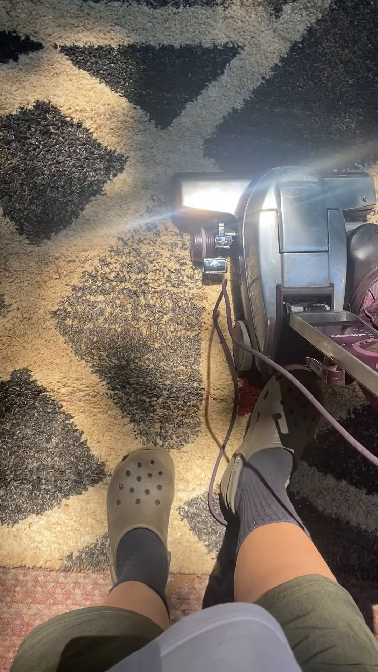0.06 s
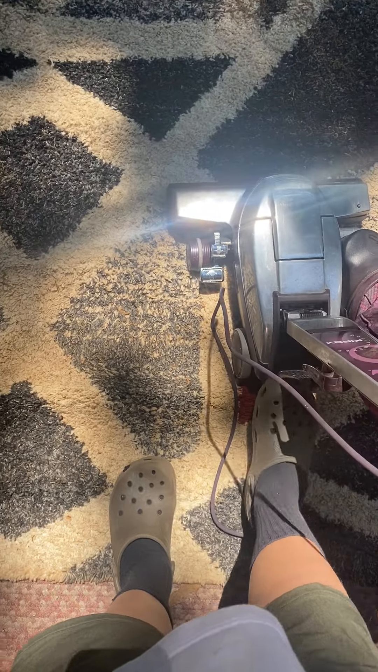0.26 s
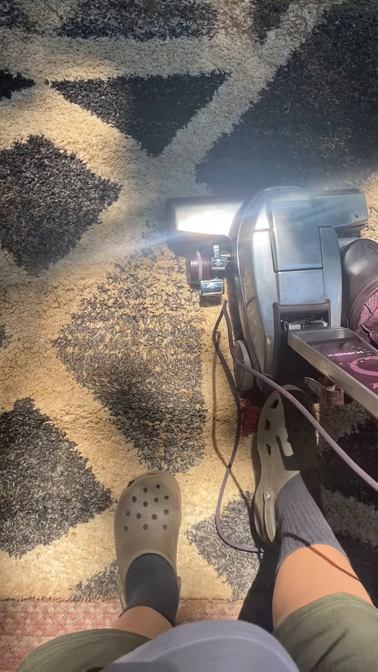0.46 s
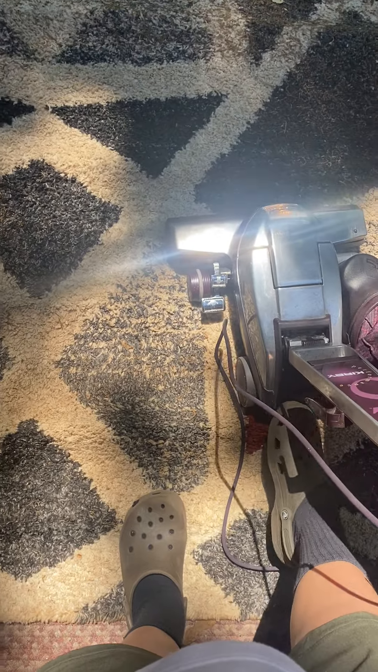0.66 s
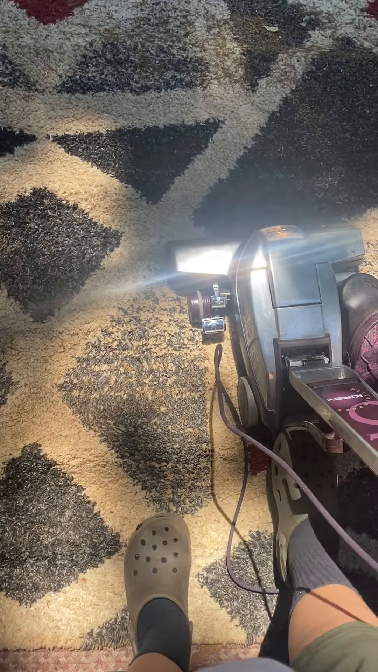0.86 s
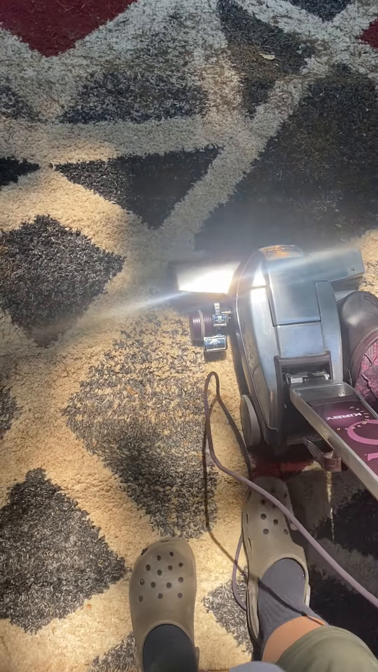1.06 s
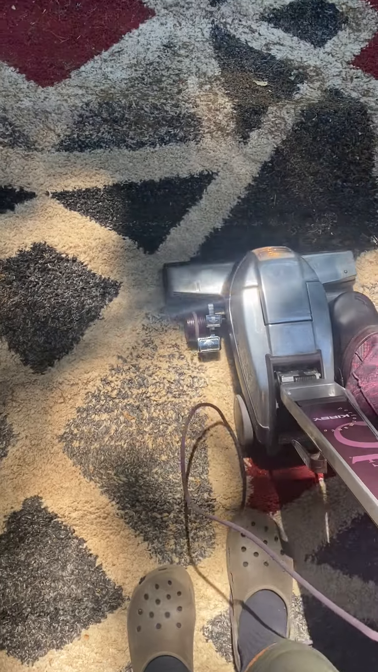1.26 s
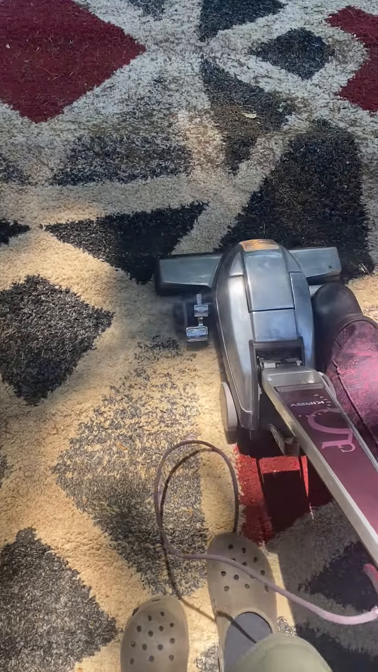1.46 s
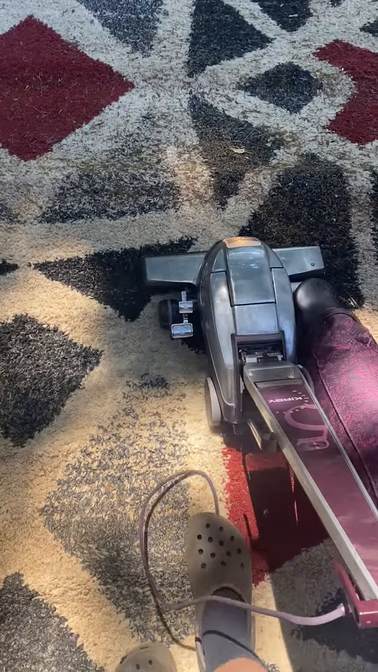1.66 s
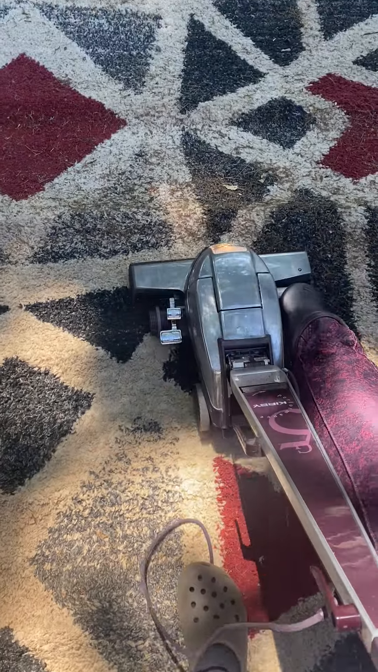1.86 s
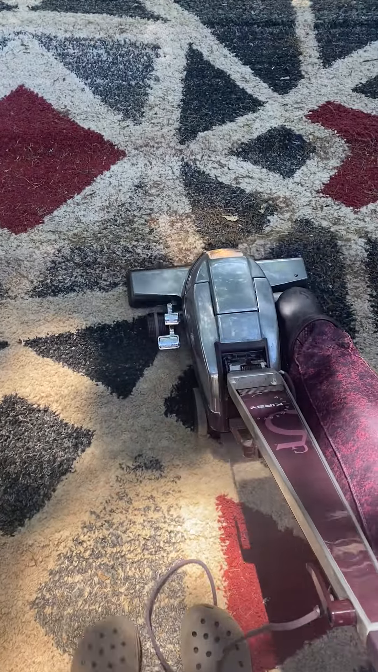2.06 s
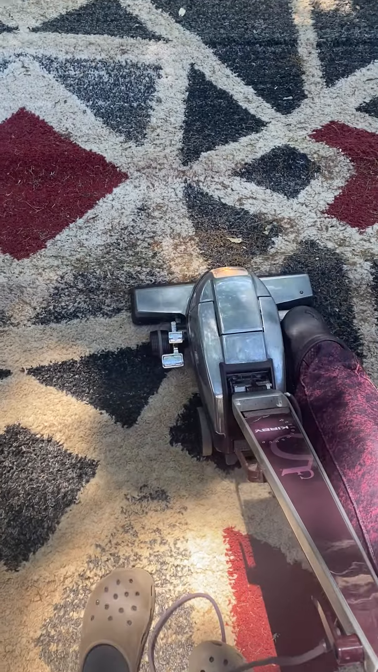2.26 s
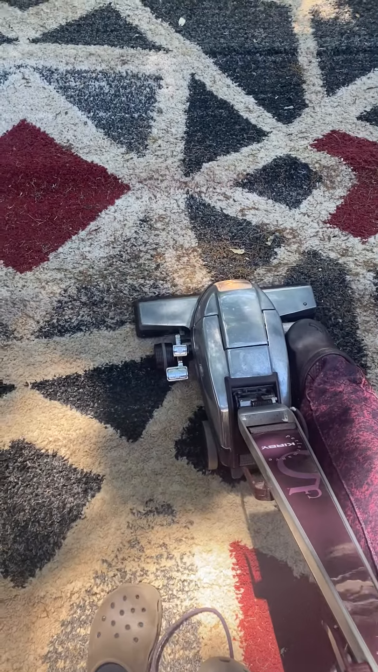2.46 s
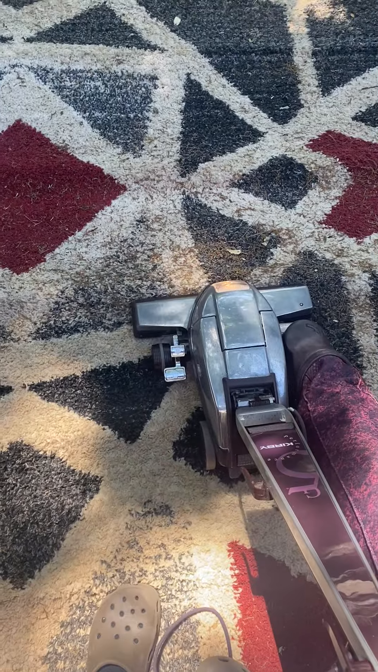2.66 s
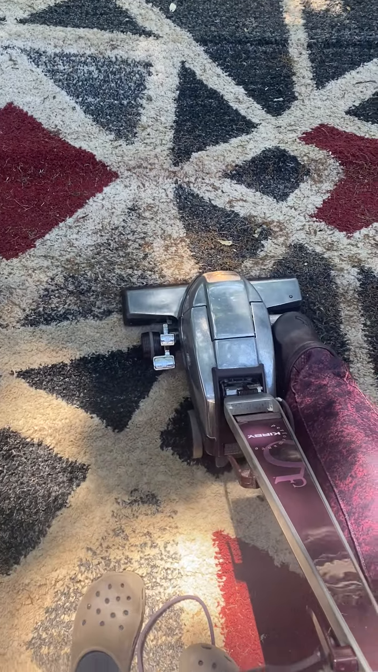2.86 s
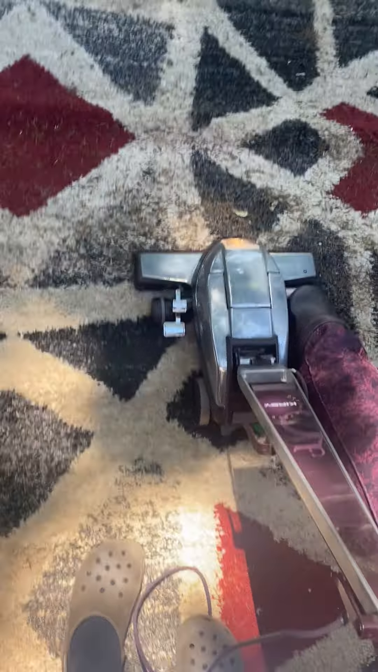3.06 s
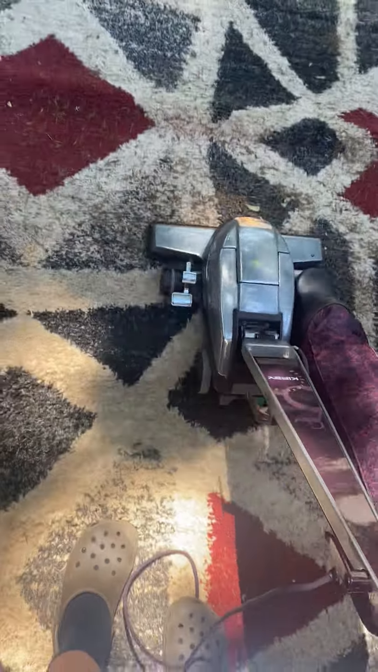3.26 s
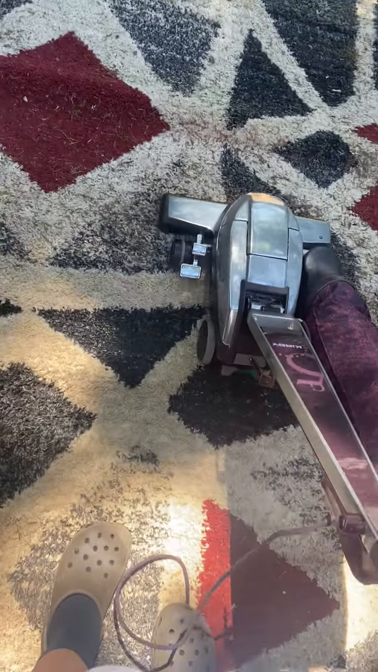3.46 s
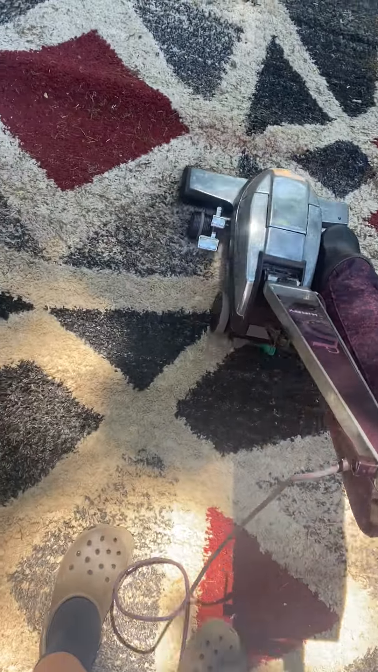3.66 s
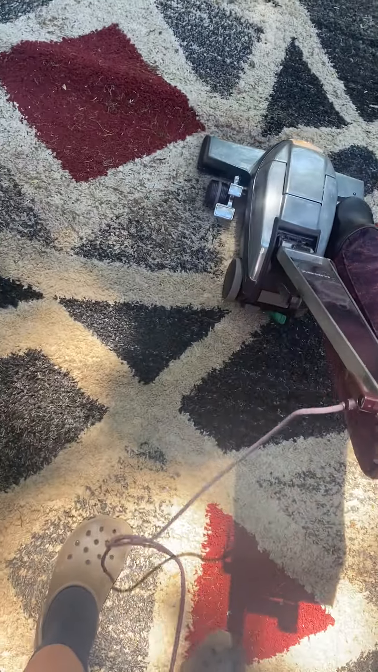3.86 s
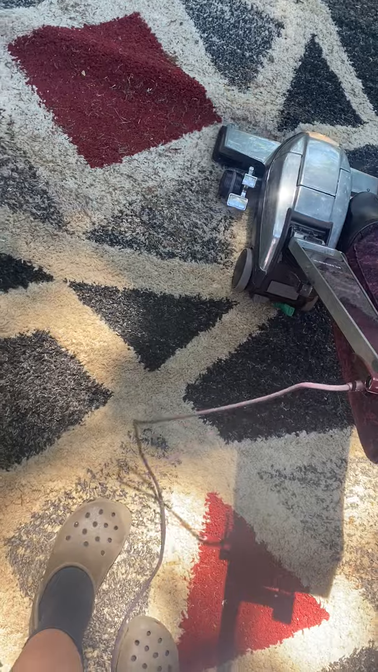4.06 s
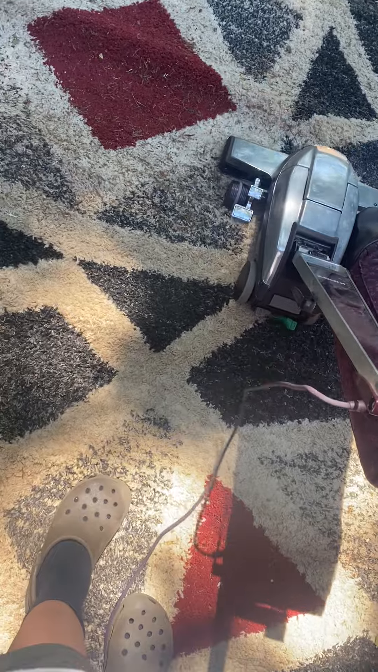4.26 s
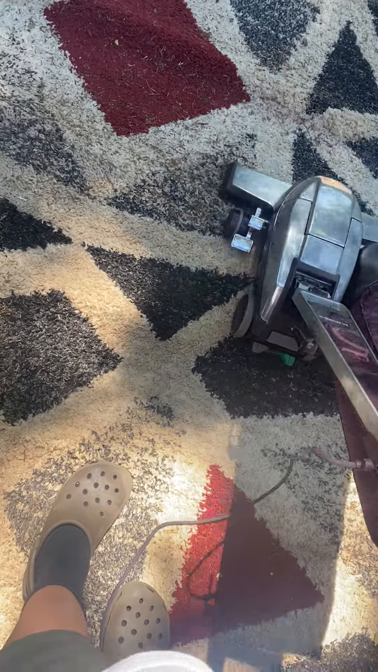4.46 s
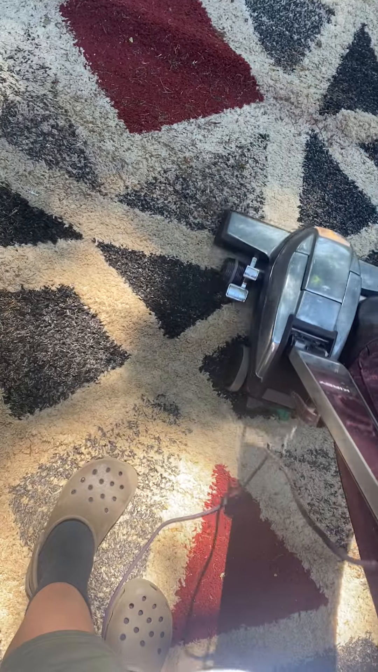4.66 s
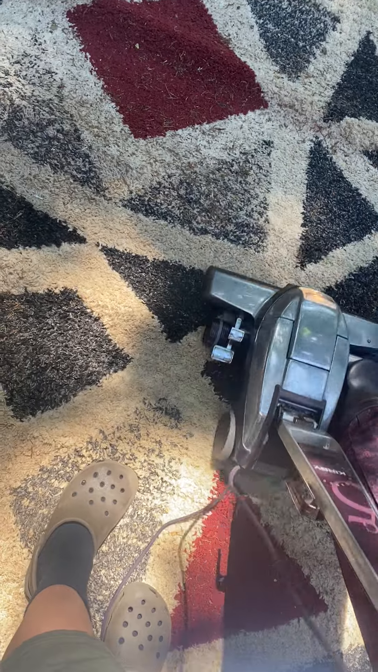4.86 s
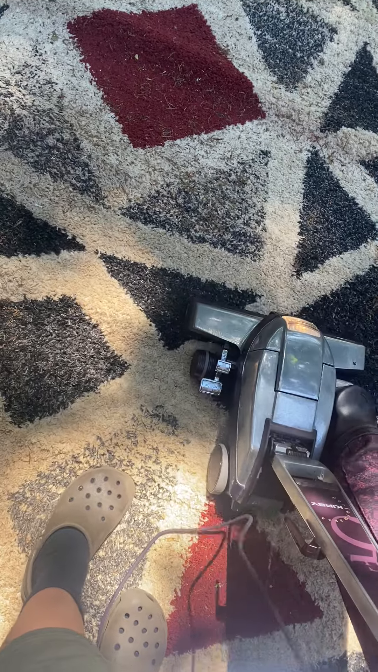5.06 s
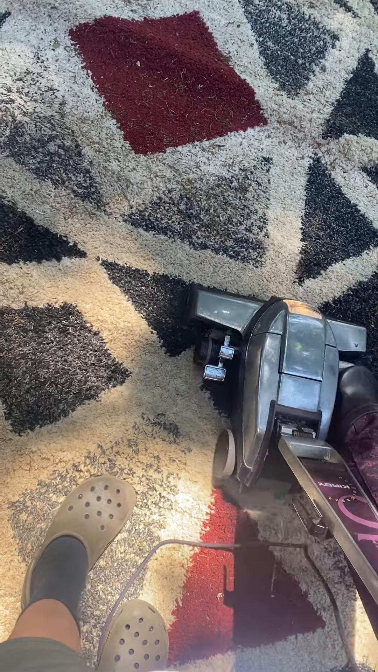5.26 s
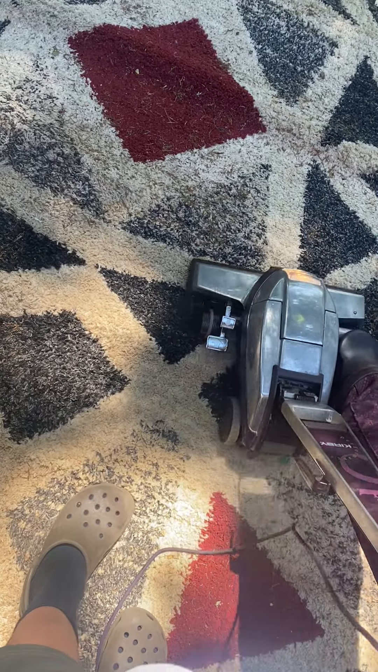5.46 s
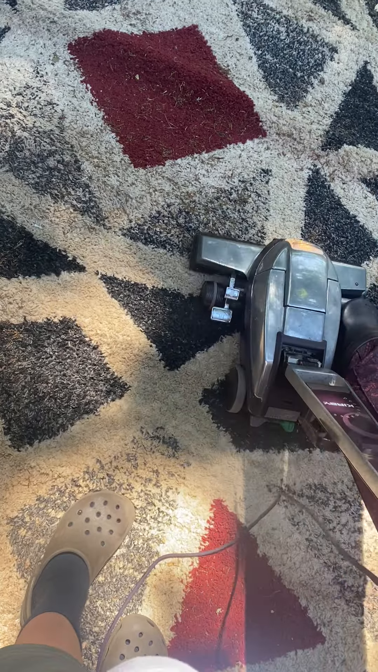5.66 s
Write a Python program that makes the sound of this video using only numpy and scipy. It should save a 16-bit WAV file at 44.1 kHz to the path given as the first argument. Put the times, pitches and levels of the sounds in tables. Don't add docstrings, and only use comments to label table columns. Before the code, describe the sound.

Close up in a quiet yard, a shoe knocks a pedal, a latch snaps and a switch clicks. An upright vacuum's motor sweeps up in under a second to a high whine over roaring, hissing air. Its brush roll hums on the rug, grit pings inside, and gears sing louder during two pushes. A phone at arm's length above captures it in stereo.

```python
import sys
import numpy as np
from scipy import signal
from scipy.fft import rfft, irfft, next_fast_len
from scipy.io import wavfile
from scipy.ndimage import uniform_filter1d

SR = 44100
rng = np.random.default_rng(int(sys.argv[2]) if len(sys.argv) > 2 else 0)


def amp(db):
    return 10 ** (np.asarray(db, float) / 20)


def write(x):
    x = np.atleast_2d(x).T
    wavfile.write(sys.argv[1], SR, np.round(np.clip(x, -1, 1) * 32767).astype(np.int16))


N = 251811
T = np.arange(N) / SR

# frequency in Hz, level in dB per Hz.
YARD = [(15, -36), (25, -6), (92, 2), (281, -15), (355, -13.5), (782, -23), (1190, -22), (1570, -27),
        (1690, -33), (2030, -28), (2680, -28), (6060, -43), (6500, -44), (8450, -79), (14300, -120)]
YARD_DB = -52.5

# frequency in Hz, level in dB per Hz.
ROAR = [(18, -61), (30, -44), (54, -49), (90, -27), (150, -9.5), (207, -6), (255, -6.5), (340, -2.5),
        (399, -2.5), (517, -3.5), (668, -14.5), (797, -12.5), (1400, -27), (1820, -37.5), (3080, -120)]
RUSH = [(590, -10.5), (1000, -6.5), (1370, -9.5), (1510, -5), (1740, -4.5), (2280, -1.5), (2900, -14.5),
        (3200, -20), (4160, -46), (7040, -120)]
HISS = [(2400, -28), (2900, -9), (3300, -0.5), (3650, 0), (4000, -1.5), (4300, -2.5), (4700, -2.5),
        (5200, 0.5), (5700, -4), (7100, -7), (7800, -4), (9000, -46)]
FIZZ = [(6500, -47), (7800, -7), (8400, 1.5), (9400, -2), (10500, -5.5), (13500, -9.5), (15700, -11),
        (15950, -60)]
# level in dB, slope in dB per dB of speed, gain in a hard push in dB.
AIR_LEVELS = [
    (-22, 2, -0.5),
    (-29, 1, -1),
    (-35.5, 0.47, 2),
    (-47.5, 1, 2.5),
]
# time in seconds, level in dB.
SEAT = [(.9, 3), (1.6, 1), (1.75, 1), (2.3, -1), (2.7, 0), (2.9, -2.5), (3.1, 0), (3.3, -1), (3.65, -0.5),
        (3.9, -1), (4.4, -2), (4.48, 1.5), (4.75, 1), (5.0, 1), (5.7, -0.5)]
# centre in seconds, length in seconds, change in dB.
JOLTS = [
    (.575, 0.043, 8),
    (2.47, 0.035, -4),
    (3.315, 0.024, 4),
    (3.35, .015, -3),
    (3.46, .03, 3.5),
    (3.515, 0.033, 5),
    (3.575, .02, -14),
    (4.8, 0.032, -2),
    (4.9, 0.096, 0),
]
# centre in seconds, length in seconds, change in dB.
RIDGES = [
    (2.92, .12, 1.5),
    (3.51, .06, 1.5),
    (.72, .016, 2),
    (0.83, .03, 2),
    (5.6, 0.24, -2),
    (3.05, 0.34, 2.5),
    (4.6, 0.52, 0.5),
    (4.12, .15, 0),
]
# centre in seconds, length in seconds, change in dB.
OUTLET_SWINGS = [
    (2.6, 0.61, -1),
    (3.05, 0.27, 0.5),
    (3.75, .3, -0.5),
    (5.08, 0.2, -2),
]
# centre in seconds, length in seconds, change in dB.
DUST_STREAMS = [
    (4.63, 0.6, 1),
    (4.9, 0.065, 3.5),
    (4.0, 0.54, 1),
    (3.64, 0.32, 1.5),
]
SUCTION_S, SUCTION_LAG_DB = 0.12, -19
# frequency in Hz, width in Hz, level in dB.
AIR_SPACES = [
    (392.6, 44, -29.5),
    (520.5, 59, -32),
    (805.4, 60, -40),
]

# start in seconds, peak in dB, fall by 60 dB in seconds,
# scuff in dB, spring tick in dB.
PEDAL_KNOCKS = [
    (0.08, -50, 0.02, -1, -30),
    (0.101, -33.5, 0.037, 1.5, -20),
    (0.131, -44, 0.034, -5, -18),
    (0.242, -60, 0.02, -9, -8),
    (0.353, -48, 0.025, -3, -28),
    (0.382, -46, 0.02, -1, -14),
    (0.3988, -23.5, 0.019, -4, 2),
    (0.43, -43, 0.023, -1, -22),
    (0.548, -19, 0.025, -9, -19),
    (0.553, -31, 0.016, -12, -21),
]
# frequency in Hz, width in Hz, level in dB.
PEDAL_BODY = [(345, 49, 8), (1020, 860, 11), (2130, 330, 11), (3350, 660, -6), (4470, 670, -2),
              (11000, 8300, -31)]
# start in seconds, peak in dB, frequency in Hz, fall by 60 dB in seconds.
LATCH = [(0.08, -47, 900, .02), (0.121, -46, 1000, .015), (0.146, -44, 980, .02), (0.102, -37, 2240, .02),
         (0.103, -37, 1010, 0.054), (0.132, -38, 1020, .02), (0.132, -45, 2000, .012),
         (0.353, -48, 1050, .02), (0.3992, -15, 2260, 0.0088), (0.43, -38, 1020, 0.018),
         (0.43, -44, 4300, .012), (0.43, -46, 2180, .012), (0.402, -43, 354, 0.18), (0.15, -50, 418, .1),
         (0.385, -47, 2250, .02), (0.548, -27, 990, 0.03), (0.549, -26, 4650, .012),
         (0.549, -25, 3600, .012)]
# centre in seconds, length in seconds, level in dB.
SHOE_RUBS = [
    (0.197, 0.2, -81),
    (.33, 0.081, -86),
    (.46, .1, -78),
]

# start in seconds, peak in dB, ring in Hz, knock on the nozzle in dB.
GRIT = [(1.4637, -33, 9190, -2), (1.5069, -17.5, 9550, -2), (1.708, -28.5, 9320, -2),
        (1.865, -19, 9620, -5), (1.8996, -17, 9380, -7), (1.939, -20, 9400, -14), (2.021, -22, 9180, -6),
        (2.2338, -18, 9510, -4), (2.403, -23.5, 8520, -4), (3.367, -10, 10200, -11),
        (3.3795, -21, 10000, -6), (3.3915, -19, 10360, -3), (3.4381, -23, 10260, 4),
        (3.4535, -19, 11000, -6), (3.467, -25, 9500, -6), (3.498, -16, 9560, -3), (3.502, -16, 10350, -1),
        (3.5053, -13.5, 9700, 5.5), (3.508, -23, 10200, 1), (3.522, -27, 9440, -2),
        (3.5294, -9.5, 10700, 1.5), (3.568, -16, 9860, -3), (3.6165, -26, 11940, -6),
        (3.655, -26, 9360, -4), (3.683, -28, 11500, -6), (3.69, -18, 11000, -6), (3.70, -28, 9500, -6),
        (3.7518, -34, 9550, -2), (3.8175, -22.5, 10400, -2), (4.0358, -27, 9940, -2),
        (4.0627, -20, 9770, -4)]
# start in seconds, peak in dB, frequency in Hz.
PEBBLES = [
    (3.522, -25, 4850),
    (3.522, -24, 6100),
    (3.5295, -23, 4760),
]
GRIT_T60_S = 0.0095
SANDY_S, SAND_PER_S, DUST_PER_S = (2.6, 4.4), 67, 15.

# time in seconds, frequency in Hz, level in dB.
SNAG = [
    (4.42, 520.5, -50),
    (4.46, 474, -16.5),
    (4.482, 355, -38),
    (4.5, 237.8, -19),
    (4.515, 203.2, -48),
]
# time in seconds, bristle-row beat in Hz, beat in dB, wobble of the roll in dB.
BRUSH = [(.62, 89.1, -49, -63), (.73, 141.7, -31, -57), (.82, 167.2, -21, -40), (.89, 178, -20.5, -31),
         (1.1, 193.3, -22.5, -27), (1.28, 201.3, -22.5, -30.5), (1.9, 214.6, -27.5, -35.5),
         (2.2, 213.4, -21.5, -31.5), (2.32, 208.8, -22, -47.5), (2.95, 201.2, -21.5, -32),
         (3.34, 202.7, -28, -39), (3.405, 218.9, -25, -41.5), (3.87, 208.5, -24, -37.5),
         (4.1, 200.8, -24.5, -36), (4.85, 204.7, -27.5, -30.5), (5.11, 194.4, -20.5, -35.5),
         (5.22, 204.7, -26.5, -30.5), (5.45, 215.8, -27.5, -33.5), (5.71, 217.7, -28, -32)]
# multiple of the beat, level in dB, blur in Hz.
BRUSH_UPPER = [
    (2.5, -34, 10.28),
    (3, -42, 8.84),
    (4, -45, 9.1),
]
# frequency in Hz, level in dB.
HOUSING = [(235, -37), (268, -21), (295, -33.5), (322, -24), (345, -17.5), (375, -72), (405, -28),
           (432, -32)]
# centre in seconds, length in seconds, change in dB.
SKIPS = [
    (1.26, .05, -3),
    (3.36, .05, -5),
    (4.35, .08, -3),
    (4.43, .1, -14),
    (4.54, .08, 3),
    (4.615, .05, -11),
    (4.68, .03, -5),
    (4.75, .08, -11),
    (5.02, .05, -4),
]
# centre in seconds, length in seconds, change of wobble in dB.
ROLL_WOBBLE = [
    (1.32, .04, 5),
    (1.5, 0.092, -1),
    (2.42, .2, 2),
    (3.3, .12, 0),
    (3.72, 0.32, -3),
    (4.6, 0.27, -6.5),
    (5.03, .05, -6),
    (5.45, 0.061, -10),
]
# centre in seconds, length in seconds, change in dB.
PILE_DAMPING = [
    (1.45, 0.39, 5),
    (2.7, 0.74, -8),
    (4.3, 0.601, -7),
    (5.55, .35, -6),
]

# time in seconds, commutator tone at full run-up
# in Hz, then the lines one mains beat below, on and above that tone in dB.
RUNNING = [(.6, 3765, -9, 0, -3), (.64, 4200, -10, 4, 1), (.69, 4400, -6, 7.5, 5), (.8, 4345, -8, 2, 1),
           (.94, 4440, -8, 6, -4), (1.02, 4397, -7, 5, -5), (1.14, 4335, -1, 0, -11),
           (1.26, 4294, -8, -4, 2), (1.36, 4303, -3, -3, 3), (1.5, 4277, -4, 4, -5),
           (1.72, 4287, 0, -3, -5), (1.95, 4312, 0, -2, -18), (2.15, 4320, -6, 6, -12),
           (2.4, 4300, -5, 2, -14), (2.6, 4275, -9, 0, -11), (2.82, 4266, -19, 0, -7),
           (3.06, 4235, 1, 4, 4), (3.18, 4217, 0, 5, 2), (3.32, 4220, 0, 4, 0), (3.375, 4206, 2, 5, -1),
           (3.45, 4257, 2, 2, -2), (3.55, 4305, 1, 0, 0), (3.66, 4283, 1, 3.5, -10), (3.9, 4278, 0, 6, -8),
           (4.02, 4246, -2, 0, -9), (4.26, 4142, 1, 8, -3), (4.37, 4101, -2, 5.5, -2),
           (4.5, 4161, 2, 9, -2), (4.62, 4123, 6, 5.5, 5), (4.84, 4185, -5, 2, 3),
           (4.96, 4176, -13, -5, -4), (5.22, 4217, -16, -3, -4), (5.34, 4230, -14, -7, 0),
           (5.5, 4314, -3, -1.5, -4), (5.7, 4336, -1, 3, -5)]
MAINS_BEAT_HZ = 120
START_SPLIT_DB = 1.5
SWITCH_ON_S, SPIN_FROM_S, SPIN_TAU_S = .55, .525, .235
# frequency in Hz, level in dB.
SHELL = [(700, -44), (1000, -37), (1200, -42), (1400, -51), (1650, -34), (1850, -33), (2080, -33),
         (2250, -34), (2350, -46), (2500, -43), (2700, -45), (2950, -56), (3090, -46), (3250, -52),
         (3500, -52), (3660, -45), (3780, -49), (3950, -44.5), (4500, -45.5)]
# centre in seconds, length in seconds, change in dB.
CHOKES = [
    (.703, .022, -12),
    (.865, .075, -10),
    (.955, .04, -8),
    (1.18, .05, -4),
]
SHAFT = [1.09, 1.136, 2.182]
# time in seconds, level of each tone in dB.
SHAFT_DB = [(1.0, -66, -58, -70), (1.5, -64, -52, -62), (2.2, -62, -51, -59), (2.9, -62, -47, -59),
            (3.2, -62, -48, -65), (3.9, -62, -50, -68), (4.1, -64, -56, -63), (4.85, -64, -55, -62),
            (5.0, -66, -56, -70), (5.7, -66, -56, -70)]
# time in seconds, level in dB.
FAN = [(.9, -48), (1.1, -43.5), (1.3, -39), (2.0, -41.5), (2.8, -41), (3.3, -35.5), (3.9, -39.5),
       (4.05, -39), (4.77, -47), (4.84, -45), (5.2, -38), (5.7, -34)]
# multiple of the commutator tone, level in dB.
GEARS = [(.298, -9), (.368, -7), (.524, -2), (0.597, 0), (.77, -17), (.893, -3.5), (1.186, -10),
         (1.29, -15)]
# start in seconds, length in seconds, effort 0-1.
PUSHES = [
    (2.915, 0.268, 0.95),
    (3.915, 0.98, 1.0),
]
PUSH_RISE_S, PUSH_FALL_S, GEAR_IDLE_DB, GEAR_LOADED_DB = 0.11, 0.027, -75, -40
# centre in seconds, length in seconds, change in dB.
GEAR_SLIPS = [
    (3.05, .3, -8),
    (3.95, .12, -10),
    (4.22, .05, -5),
    (4.435, .04, -6),
    (4.655, .05, -7),
    (4.88, .13, -16),
]
# centre in seconds, length in seconds, change in dB.
GEAR_EASING = [
    (4.2, 0.083, -8),
    (4.55, 0.74, 1),
]

# frequency in Hz, lead in radians.
PORT_LEAD = [(0, 0), (800, -.4), (1100, .05), (2000, 0), (2550, .63), (3200, .43), (4300, .82), (4950, .15),
             (5340, .5), (7300, 3.14), (10400, 6.28), (13500, 9.42), (16000, 12.3)]
# frequency in Hz, left over right in dB.
PORT_TILT = [(60, -.2), (300, -1.4), (650, -2.5), (900, -5.2), (1350, -.4), (1900, -.4), (2350, -3.3),
             (3600, -1.2), (4300, -2.9), (5000, .4), (8000, 0)]
# frequency in Hz, share 0-1.
PORT_SAME = [(60, 1), (400, .995), (1050, .91), (1400, .99), (1900, .99), (2550, .91), (3000, .72),
             (4300, .8), (4650, .75), (5100, .94), (6000, .86), (7300, .91), (10400, .87), (12000, .75),
             (16000, .72)]


def evened(x):
    return x / np.sqrt(np.mean(abs(x) ** 2) + 1e-20)


def read(points, hz):
    f, value = np.transpose(points)
    return np.interp(np.log(hz + 1), np.log(f + 1), value)


def follow(rows):
    s, *columns = np.transpose(rows)
    return [np.interp(T, s, column) for column in columns]


def bumps(rows):
    return sum(db * np.exp(-(2 * (T - s) / length) ** 4) for s, length, db in rows)


def drift(hz):
    pole = np.exp(-2 * np.pi * hz / SR)
    return evened(signal.lfilter([1], [1, -2 * pole, pole ** 2], rng.standard_normal(N)))


def tone(hz):
    return np.sqrt(2) * np.sin(2 * np.pi * (np.cumsum(hz) / SR + rng.random()))


def band_noise(white, low_hz, high_hz):
    band = signal.butter(2, [low_hz, high_hz], "band", fs=SR, output="sos")
    return evened(signal.sosfilt(band, white))


def noise(shape, patchy_db, size=512):
    frames = 4 * N // size + 8
    hz = np.fft.rfftfreq(size, 1 / SR)
    a, b, c, d, patches = rng.standard_normal((frames, len(hz), 5)).T
    patches = uniform_filter1d(patches, size=5, axis=0)
    patches = evened(uniform_filter1d(patches, size=12, axis=1))
    level = amp(read(shape, hz)[:, None] + patchy_db * patches)
    z = np.array([a + 1j * b, c + 1j * d]) * level
    return evened(signal.istft(z, nperseg=size, noverlap=size * 3 // 4)[1][:, :N])


def burst(s, db, t60, rise=0.0012):
    out = np.zeros(N)
    span = (T > s) & (T < s + .6)
    t = T[span] - s
    out[span] = amp(db - 60 * t / np.clip(t60, .003, .3)) * np.minimum(t / rise, 1)
    return out


def run_up():
    return np.maximum(1 - np.exp(-(T - SPIN_FROM_S) / SPIN_TAU_S), .05)


def effort():
    total = 0
    for s, length, share in PUSHES:
        rise = (T - s) / PUSH_RISE_S
        fall = 1 - (T - s - length) / PUSH_FALL_S
        total = total + share * np.clip(np.minimum(rise, fall), 0, 1)
    return total


def yard():
    return amp(YARD_DB) * noise(YARD, patchy_db=3.5, size=2048)


def air(puff):
    speed_db, push = 20 * np.log10(run_up()), effort()
    seat_db, jolt_db = follow(SEAT)[0], bumps(JOLTS)
    roar_db, rush_db, hiss_db, fizz_db = [
        db + slope * speed_db + push_db * push for db, slope, push_db in AIR_LEVELS]
    roar_db = roar_db + seat_db + jolt_db
    rush_db = rush_db + 0.37 * seat_db + 0.057 * jolt_db + bumps(RIDGES)
    lag_db = SUCTION_LAG_DB * np.clip(1 - (T - SWITCH_ON_S) / SUCTION_S, 0, 1)
    hiss_db = hiss_db + bumps(OUTLET_SWINGS) + 0.082 * jolt_db + lag_db
    fizz_db = fizz_db + bumps(DUST_STREAMS) + 0.22 * jolt_db + lag_db
    gust_db = drift(69)
    rush_puff = 1 + 0.069 * (puff - 1) / 0.42
    out = amp(roar_db - 0.5 + 0.27 * gust_db) * puff * noise(ROAR, patchy_db=1.5, size=2048)
    out += amp(rush_db + 0.24 + 0.3 * gust_db) * rush_puff * noise(RUSH, patchy_db=1.5)
    out += amp(hiss_db - 1.5 + 0.92 * gust_db) * noise(HISS, patchy_db=0.86)
    out += amp(fizz_db + 3.0 + 0.28 * gust_db) * noise(FIZZ, patchy_db=1.5)
    return out * np.clip((T - .548) / 0.0061, 0, 1)


def cavity():
    hz = np.fft.rfftfreq(N, 1 / SR)
    booms = 0
    for f, width, db in AIR_SPACES:
        dip_db = (f > 700) * 5.6 * np.exp(-((T - 4.1) / 0.35) ** 2)
        boom = irfft(rfft(rng.standard_normal(N)) / (1 + (2 * (hz - f) / width) ** 2), N)
        booms = booms + amp(db + 2.37 * drift(9.) - dip_db) * evened(boom)
    contact = amp(follow(SEAT)[0] + bumps(JOLTS))
    return booms * run_up() ** 3 * contact * np.clip((T - .65) / .15, 0, 1)


def pedal():
    hz = np.fft.rfftfreq(N, 1 / SR)
    shell = sum(amp(db) / (1 + 2j * (hz - f) / width) for f, width, db in PEDAL_BODY) + amp(-30)
    ring = evened(irfft(rfft(rng.standard_normal(N)) * shell, N))
    spring = evened(np.diff(uniform_filter1d(rng.standard_normal(N + 2), size=2), 2))
    out = np.zeros(N)
    for s, db, t60, scuff_db, tick_db in PEDAL_KNOCKS:
        crack = burst(s, db - 3.0, t60, 0.0033)
        scuff = burst(s, db + scuff_db - 22.0, 7.6 * t60, 0.0046)
        out += ring * (crack + scuff)
        out += spring * burst(s, db + tick_db, 0.0095)
    rub = band_noise(spring, 7500, 12500)
    rubbing = sum(amp(db) * np.exp(-(2 * (T - s) / length) ** 2) for s, length, db in SHOE_RUBS)
    out += rub * amp(2.7 * drift(40.5)) * rubbing
    out += burst(SWITCH_ON_S + 0.0073, -32.5, 0.3, 0.0069) * np.sin(2 * np.pi * 345 * T)
    out += ring * burst(0.372, -39.5, 0.11, 0.035)
    for s, db, ring_hz, t60 in LATCH:
        out += burst(s, db, t60, 0.0013) * np.sin(2 * np.pi * ring_hz * (T - s))
    return out


def grit():
    white = rng.standard_normal((2, N))
    sharp = band_noise(white[0], 6000, 14000)
    knock = band_noise(white[1], 1800, 3200)
    crack = band_noise(white[1], 3000, 7000)
    out = np.zeros(N)
    for s, db, hz, knock_db in GRIT:
        ring = np.sin(2 * np.pi * hz * (T - s))
        grain = 0.68 * sharp + 0.25 * ring + amp(knock_db) * knock + 0.22 * crack
        out += burst(s, db - 5.5, GRIT_T60_S, 0.00015) * grain
    for s, db, hz in PEBBLES:
        out += burst(s, db, 0.012, 0.0004) * np.sin(2 * np.pi * hz * (T - s))
    sandy = (T > SANDY_S[0]) & (T < SANDY_S[1])
    lands = rng.random(N) < np.where(sandy, SAND_PER_S, DUST_PER_S) / SR
    tiny = lands * amp(-37.5 + 2.4 * np.minimum(rng.exponential(1, N), 2)) * (T > .8)
    return out + sharp * signal.lfilter([1], [1, -np.exp(-1 / 38.5)], tiny)


def snag():
    hz, db = follow(SNAG)
    return amp(db) * tone(hz) * (T > SNAG[0][0]) * (T < SNAG[-1][0])


def brush():
    hz, beat_db, wobble_db = follow(BRUSH)
    skip_db = bumps(SKIPS)
    beat_db = beat_db + skip_db
    wobble_db = wobble_db + 1.5 * skip_db + bumps(ROLL_WOBBLE) + 1.6 * drift(6.1)
    third_db = read(HOUSING, 1.452 * hz) + skip_db + bumps(PILE_DAMPING) + 1.9 * drift(4.4)
    double_db = read(HOUSING, 2 * hz) + 3.3 * drift(18)
    start = np.clip((T - .65) / 0.082, 0, 1)
    out = amp(beat_db + 1.03 * drift(7.6)) * tone(hz + 1.3 * drift(12.3))
    out += amp(wobble_db) * tone(hz / 2 + 1.21 * drift(9.))
    out += amp(third_db - 2.5) * start * tone(1.5 * hz + 3.335 * drift(8.1))
    out += amp(double_db - 6.0) * start * tone(2 * hz + 9.22 * drift(12.32))
    for k, db, blur_hz in BRUSH_UPPER:
        out += amp(db + 2 * drift(4.1)) * start * tone(k * hz + blur_hz * drift(9.25))
    puff = 1 + 0.085 * tone(hz) + 0.1 * tone(hz / 2)
    return out * np.clip((T - .58) / 0.15, 0, 1), puff


def gears(hz):
    out = 0
    for k, db in GEARS:
        db = db + 1.6 * drift(11.)
        if k > .7:
            db = db + bumps(GEAR_SLIPS)
        if abs(k - .6) < .03:
            db = db + bumps(GEAR_EASING)
        out = out + amp(db) * tone(k * hz * (1 + 0.00449 * drift(27.4)))
    return out * amp(GEAR_IDLE_DB + (GEAR_LOADED_DB - GEAR_IDLE_DB) * effort() + 1.2 * drift(26))


def motor():
    hz, *line_db = follow(RUNNING)
    steady_hz = hz * run_up()
    strain = np.clip((1.2 - T) / 0.8, 0, 1)
    hz = steady_hz * (1 + (0.0006 + 0.00602 * strain + 0.00064 * effort()) * drift(24.3))
    choke_db = bumps(CHOKES)
    out = np.zeros(N)
    for k, db in enumerate(line_db):
        offset_hz = (k - 1) * MAINS_BEAT_HZ
        db = db + choke_db + read(SHELL, np.maximum(steady_hz + offset_hz, 0))
        db = db + START_SPLIT_DB * strain * (2 * abs(k - 1) - 2.5)
        db = db + (1.53 - 0.6 * strain) * drift(8.4) + (0.96 + 1.0 * strain) * drift(45.0)
        out += amp(db) * tone(hz + offset_hz)
    out += amp(-40) * tone(2 * hz) * np.exp(-((T - .595) / 0.019) ** 2)
    blade_hz = 6 / 11 * hz
    bite = np.exp(-((T - .64) / 0.05) ** 2)
    out += amp(-52 + 3.1 * drift(30.5)) * tone(blade_hz) * bite
    speed = hz / hz.max()
    for k, db in zip(SHAFT, follow(SHAFT_DB)):
        shaft = tone(k * hz * (1 + .0007 * drift(30.)))
        out += amp(db + 2 * drift(12.)) * speed ** 2 * shaft * (T > .9)
    panel = tone(3110 + 2500 * (T - .8)) * np.exp(-((T - .802) / .026) ** 4)
    out += amp(-43 + 2 * drift(40.)) * panel
    blades = tone(blade_hz * (1 + 0.0034 * effort() * drift(35.)))
    out += amp(follow(FAN)[0] + 0.54 * drift(9.7)) * blades * (T > FAN[0][0])
    return (out + gears(hz)) * (T > SWITCH_ON_S)


def scene():
    beats, puff = brush()
    common, scattered = yard() + air(puff)
    solid = cavity() + pedal() + grit() + snag() + beats + motor()
    size = next_fast_len(N + 8192)
    hz = np.fft.rfftfreq(size, 1 / SR)
    same = np.clip(read(PORT_SAME, hz), 0, 1)
    left = rfft(common + solid, size)
    right = rfft(solid, size) + same * rfft(common, size)
    right = right + np.sqrt(1 - same ** 2) * rfft(scattered, size)
    half = amp(read(PORT_TILT, hz) / 2) * np.exp(.5j * np.interp(hz, *np.transpose(PORT_LEAD)))
    return np.array([irfft(left * half, size), irfft(right / half, size)])[:, :N]


def band_limit(x):
    return signal.sosfilt(signal.butter(12, 16990, fs=SR, output="sos"), x)


def record(dry):
    high_pass = signal.butter(6, 46., "high", fs=SR, output="sos")
    cut = signal.sosfilt(high_pass, dry)
    return band_limit(cut)


dry = scene()
out = record(dry)
write(out)
```